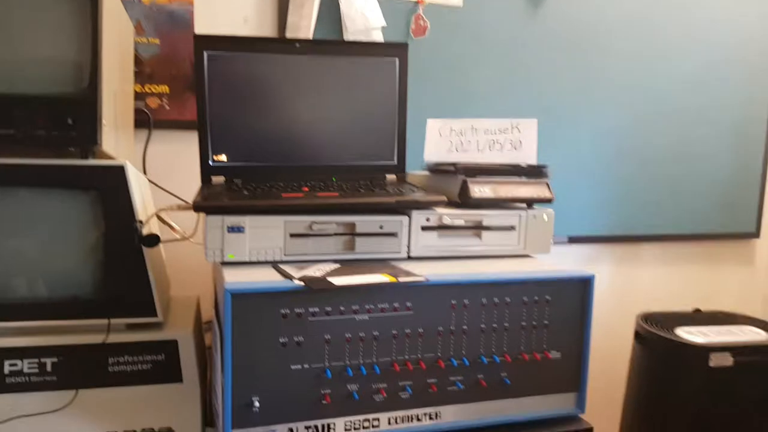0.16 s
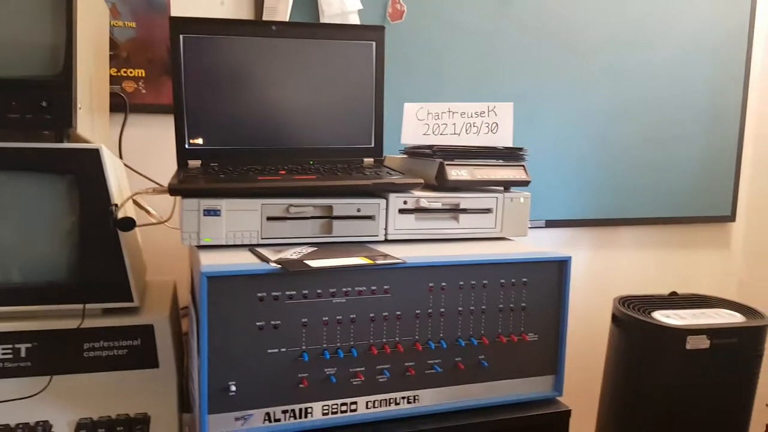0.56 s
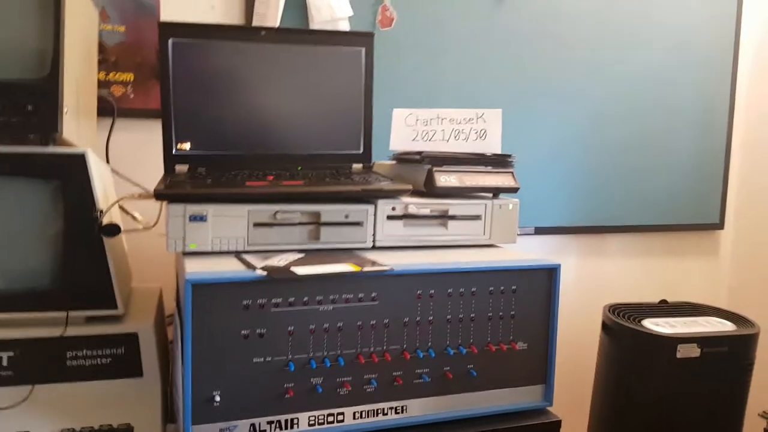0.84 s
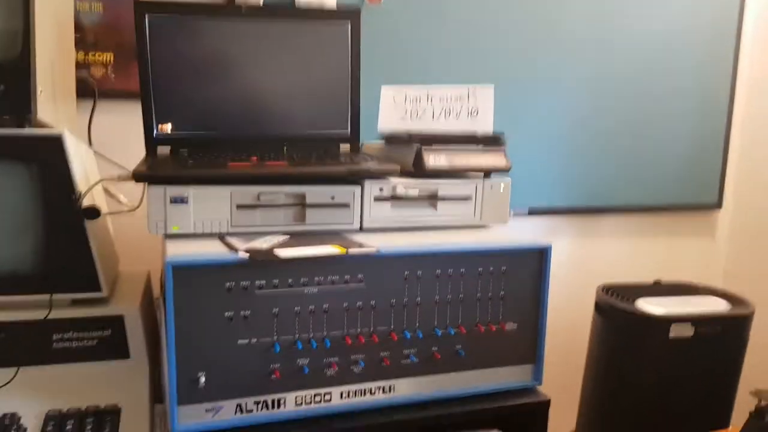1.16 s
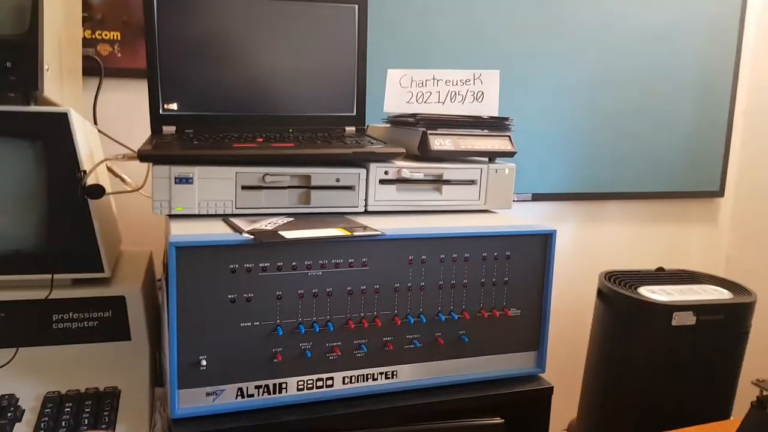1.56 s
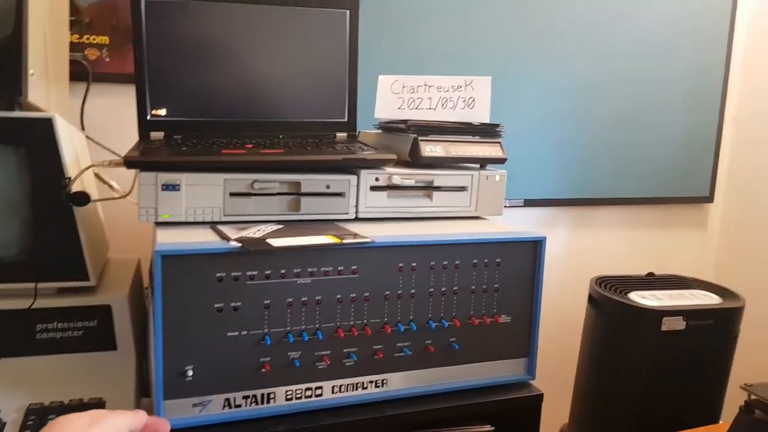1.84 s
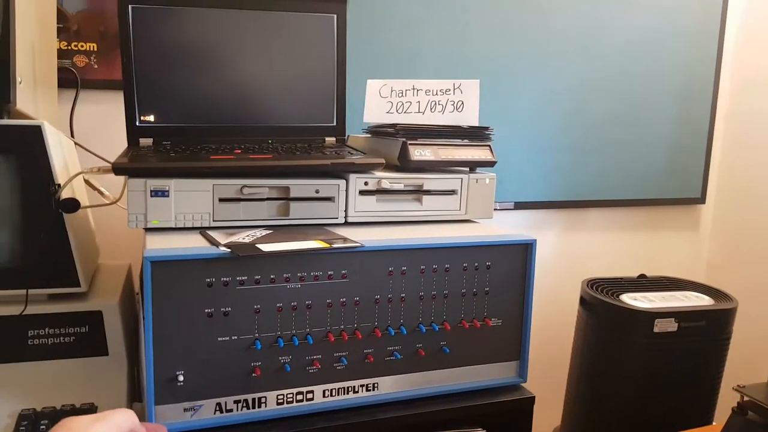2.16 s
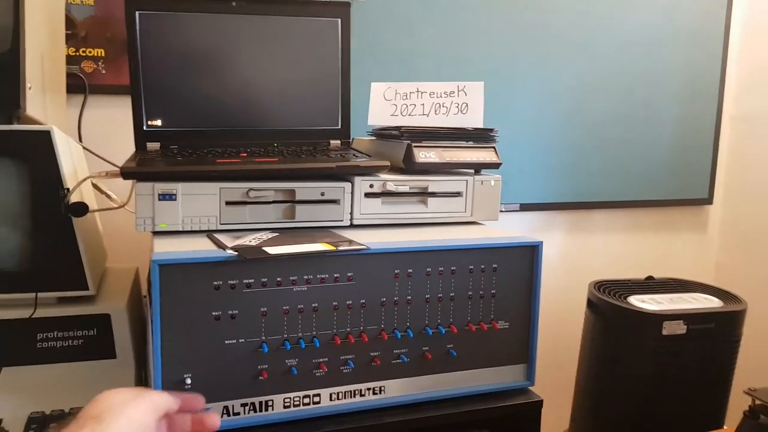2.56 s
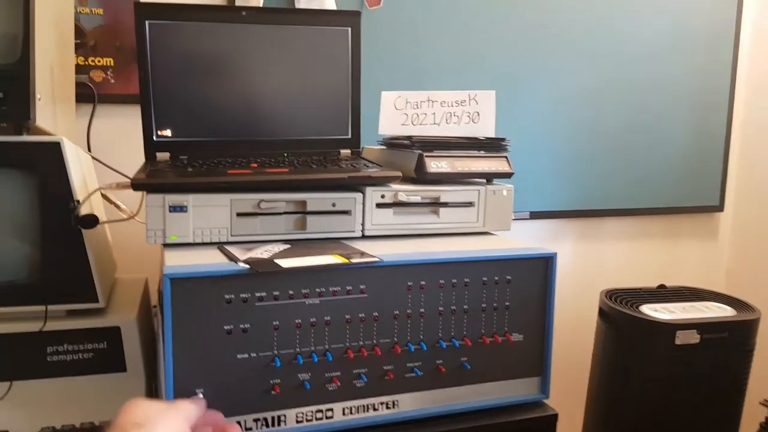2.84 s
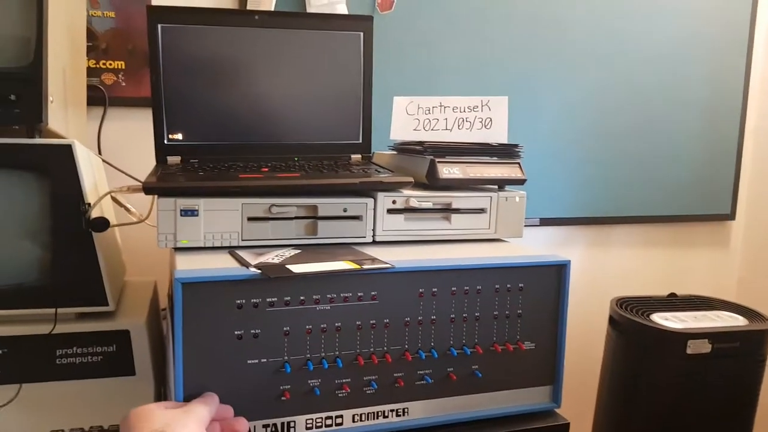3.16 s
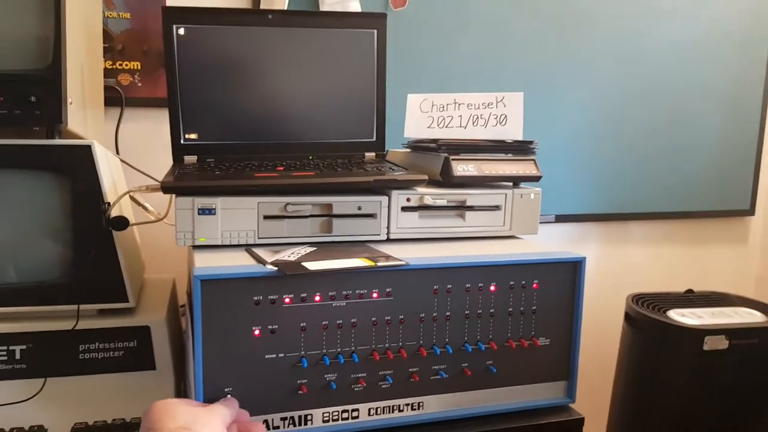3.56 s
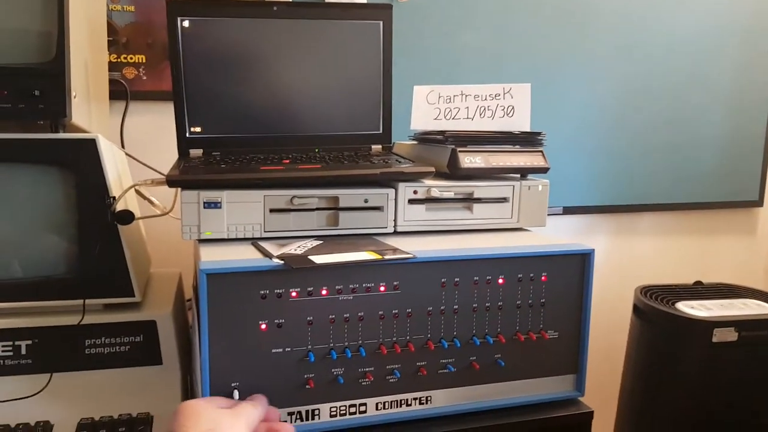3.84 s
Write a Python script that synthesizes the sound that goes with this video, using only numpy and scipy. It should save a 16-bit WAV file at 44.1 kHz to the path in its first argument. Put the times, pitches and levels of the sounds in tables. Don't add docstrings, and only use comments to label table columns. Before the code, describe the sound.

A metal toggle switch snaps once, loud and crisp, late in the clip, with tiny dull knocks after it. Before and after, fans hum steadily in a small room, heard close on a phone microphone.

```python
import sys
import numpy as np
from scipy import signal
from scipy.io import wavfile
from scipy.ndimage import uniform_filter1d

SR = 44100
rng = np.random.default_rng(int(sys.argv[2]) if len(sys.argv) > 2 else 0)


def transcribe(signal):
    frames = np.atleast_2d(signal).T
    limited = np.clip(frames, -1, 1)
    pcm = np.round(limited * 32767).astype(np.int16)
    wavfile.write(sys.argv[1], SR, pcm)


def volts_from_db(level):
    exponent = np.asarray(level, float) / 20
    return 10 ** exponent


N = 176400

# start_s, rise_s, fall_t60_s, level_db
SNAPS = [
    (3.4212, .0004, .015, -43),
    (3.4251, .0015, .018, -16),
]
# pitch_hz, level_db, t60_s
LEVER_RING = [(5300, -15, 0.021), (6240, -15, 0.011), (6700, -16.5, 0.027), (7100, -11, 0.0069),
              (7670, -14.5, 0.015), (8060, -13, .008), (8670, -8, 0.0067), (9380, -11, 0.016),
              (9800, -6, 0.0074), (11200, -10, 0.0075), (11900, -17, 0.007), (14200, -23, 0.0045),
              (15300, -25, .004)]
# start_s, rise_s, fall_t60_s, level_db
BOUNCES = [
    (3.4262, 0.0011, .022, -21),
    (3.4325, .0005, .02, -29),
    (3.4398, .0003, 0.073, -37.5),
]
# pitch_hz, level_db, t60_s
CONTACT_RING = [(3580, -15.5, 0.0082), (4500, -7.5, 0.0036), (5600, -1.5, 0.0029), (6600, 0, 0.0054),
                (7850, -7, 0.0023), (9300, 1, 0.0039), (10400, -12.5, 0.0044), (12200, -22, .004)]
# start_s, rise_s, fall_t60_s, level_db
BLOWS = [
    (3.4355, 0.0014, 0.032, -28),
    (3.4398, 0.0014, 0.037, -24),
    (3.449, 0.0012, 0.022, -30),
]
# pitch_hz, level_db, t60_s
PANEL_RING = [(277, -6.5, 0.027), (480, -7, 0.067), (812, -1, 0.053), (1055, 0, 0.016), (1530, -7.5, 0.015),
              (1980, -9.5, 0.061), (2280, -8, .03), (2725, -5.5, 0.029), (3300, -8.5, 0.0084),
              (4135, -7, .03)]
# start_s, rise_s, fall_t60_s, level_db
TOUCHES = [
    (3.3195, .001, .055, -61.5),
    (1.4766, .001, .03, -69),
]
# pitch_hz, level_db, t60_s
NAIL_RING = [(6000, 0, .002), (8000, -3, .002), (10000, -2, .002), (12000, -5, .002)]
# start_s, rise_s, pitch_hz, t60_s, level_db
SPRING_NOTE = (3.4252, .002, 9035, .022, -14)
# time_s, pitch_hz, level_db
KNOCKS = [
    (3.4564, 500, -34),
    (3.4671, 497, -26),
]
# pitch_hz, t60_s
ROOM_DECAY = [(500, .2), (3000, 0.15), (7000, 0.19), (9400, .23), (12000, 0.11), (15000, .07)]
# centre_s, length_s, pitch_hz, level_db
RUSTLES = [
    (1.07, 0.021, 2500, -59),
    (2.75, 0.16, 9000, -75),
]
# pitch_hz, level_db (per Hz)
AIR_COLOUR = [(20, -35), (90, -11), (190, -6.5), (310, -2), (650, -12), (1900, -23.5), (4200, -35),
              (8500, -45.5), (16000, -55)]
# pitch_hz, width_hz, lift_db
HOUSING = [(377.2, 49.5, 11.5), (413.3, 17, 2.5), (465.4, 63, 14.5), (720, 40, 5), (840, 159, 13),
           (1005, 120, 6), (1296, 450, 2.5), (1710, 330, 5.5), (2050, 59, -7.5), (2130, 140, 6),
           (3363, 430, 8.5), (3680, 134, 6.5), (5720, 830, 9), (7140, 1600, 3)]
# multiple of its turning rate, level_db
FIRST_MOTOR = [(1, -52), (2, -68.5), (4, -50), (5, -57), (10, -75.5), (11, -65.5), (12, -68)]
# multiple of its turning rate, level_db
SECOND_MOTOR = [(1, -59), (5, -71)]


def evened(x):
    return x / np.sqrt(np.mean(x ** 2) + 1e-20)


def read(points, hz):
    f, value = np.transpose(points)
    return np.interp(np.log(hz + 1), np.log(f + 1), value)


def drift(t, low_hz, high_hz):
    rates_hz = np.geomspace(low_hz, high_hz, num=20)
    return evened(sum(np.sin(2 * np.pi * (f * t + rng.random())) / np.sqrt(f) for f in rates_hz))


def struck(hits, modes):
    t, ring_t = np.arange(N) / SR, np.arange(4096) / SR
    ring = np.zeros(4096)
    for k, (hz, db, t60) in enumerate(modes):
        ring += (-1) ** k * volts_from_db(db - 60 * ring_t / t60) * np.sin(2 * np.pi * hz * ring_t)
    grain_db = 0.99 * rng.exponential(1, N).clip(0, 4)
    grit = evened(rng.standard_normal(N) * volts_from_db(grain_db))
    shape = np.zeros(N)
    for start, rise, t60, db in hits:
        fall = volts_from_db(db - 60 * (t - start).clip(0) / t60)
        shape += fall * ((t - start) / rise).clip(0, 1)
    return signal.oaconvolve(grit * shape, ring / np.linalg.norm(ring))[:N]


def knocks():
    t, out = np.arange(N) / SR, np.zeros(N)
    push_s = .0009
    for time, hz, db in KNOCKS:
        push = np.exp(-((t - time) / push_s) ** 2)
        out -= volts_from_db(db) * push * np.cos(2 * np.pi * hz * (t - time))
    return out


def switch():
    lever = struck(SNAPS, LEVER_RING)
    panel = struck(BLOWS, PANEL_RING)
    fingertip = struck(TOUCHES, NAIL_RING)
    contacts = struck(BOUNCES, CONTACT_RING)
    return lever + panel + fingertip + contacts + knocks()


def spring():
    start, rise, hz, t60, db = SPRING_NOTE
    t = (np.arange(N) / SR - start).clip(0)
    return volts_from_db(db - 60 * t / t60) * (t / rise).clip(0, 1) * np.sin(2 * np.pi * hz * t)


def room(x):
    level_db, gap_s = -16, .006
    hz, t, z = signal.stft(rng.standard_normal(SR // 2), SR, nperseg=256)
    decay = volts_from_db(-60 * t / read(ROOM_DECAY, hz)[:, None])
    tail = signal.istft(z * decay, SR, nperseg=256)[1]
    tail = np.r_[np.zeros(round(gap_s * SR)), tail / np.linalg.norm(tail)]
    return volts_from_db(level_db) * signal.fftconvolve(x, tail)[:N]


def rustles():
    t, out = np.arange(N) / SR, np.zeros(N)
    for centre, length, hz, db in RUSTLES:
        band = signal.butter(1, [.5 * hz, 0.92 * hz], "band", fs=SR)
        cloth = evened(signal.lfilter(*band, rng.standard_normal(N)))
        out += volts_from_db(db) * np.exp(-(2 * (t - centre) / length) ** 2) * cloth
    return out


def airflow():
    level_db, ripple_db, patch_db, swell_db = -40.5, 1.0, .7, .45
    frames, hz = N // 512 + 5, np.fft.rfftfreq(2048, 1 / SR)
    a, b, patches = rng.standard_normal((frames, 1025, 3)).T
    patches = uniform_filter1d(patches, size=16, axis=0)
    patches = evened(uniform_filter1d(patches, size=8, axis=1))
    ripple = evened(uniform_filter1d(rng.standard_normal(1025), size=3))
    colour_db = read(AIR_COLOUR, hz) + ripple_db * ripple
    for f, width, lift_db in HOUSING:
        colour_db = colour_db + lift_db * np.exp(-(2 * (hz - f) / width) ** 2)
    swell = drift(np.arange(frames) * 512 / SR, .3, 12)
    z = (a + 1j * b) * volts_from_db(colour_db[:, None] + patch_db * patches + swell_db * swell)
    air = signal.istft(z, nperseg=2048, noverlap=1536)[1][:N]
    return volts_from_db(level_db) * evened(air)


def motor(t, turn_hz, tones):
    out, waver_db = np.zeros(N), 1.0
    for k, db in tones:
        k = round(k)
        waver = np.interp(t, t[::256], drift(t[::256], 0.85, 5.6))
        level = np.sqrt(2) * volts_from_db(db + waver_db * waver)
        out += level * np.sin(2 * np.pi * k * turn_hz * t + (k - 1) ** 2)
    return out


def motors():
    t = np.arange(N) / SR - 2.25
    return motor(t, 115.24, FIRST_MOTOR) - motor(t, 117.4, SECOND_MOTOR)


def scene():
    click = switch()
    fans = airflow() + motors()
    return (click + room(click) + spring() + rustles() + fans)[None]


def top_cut(x):
    return signal.sosfilt(signal.butter(12, 16170, fs=SR, output="sos"), x)


def record(dry):
    fade_start_s, fade_s, fade_bend, edge_hz = .41, 0.33, 0.99, 15800
    fade = ((np.arange(N) / SR - fade_start_s) / fade_s).clip(0, 1) ** fade_bend
    limited = signal.oaconvolve(dry, signal.firwin(255, edge_hz, fs=SR)[None], "same")
    return top_cut(limited * fade)


dry = scene()
out = record(dry)
transcribe(out)
```